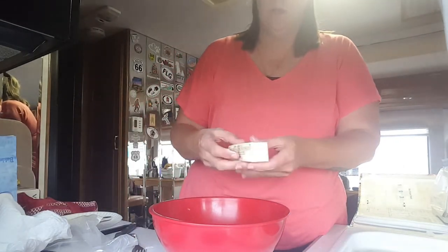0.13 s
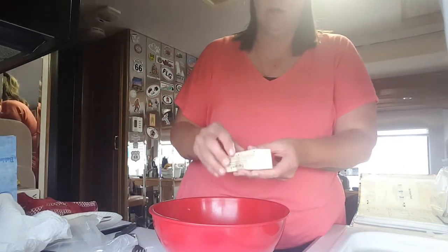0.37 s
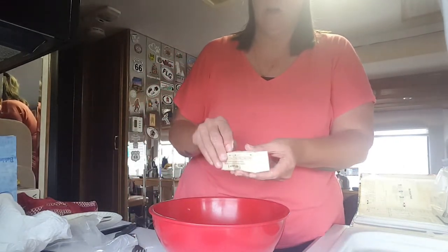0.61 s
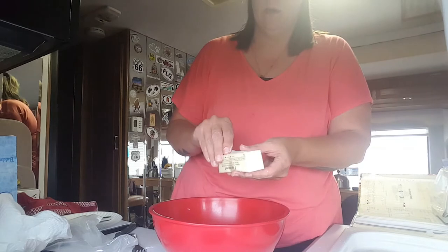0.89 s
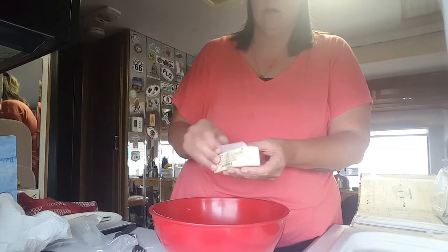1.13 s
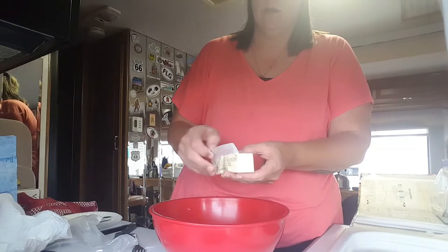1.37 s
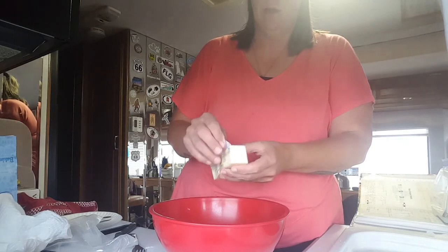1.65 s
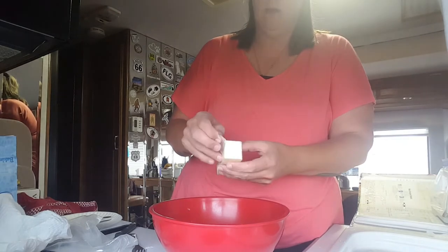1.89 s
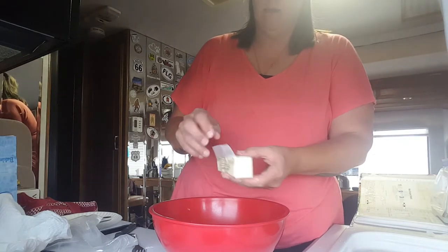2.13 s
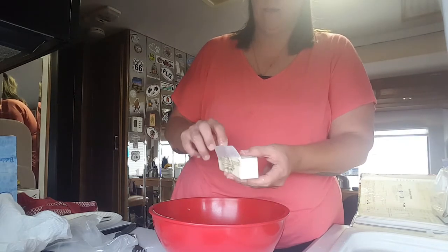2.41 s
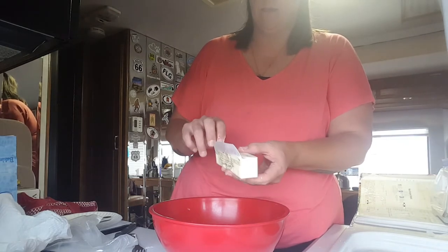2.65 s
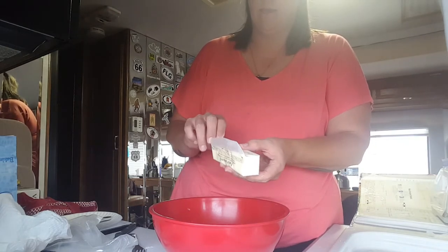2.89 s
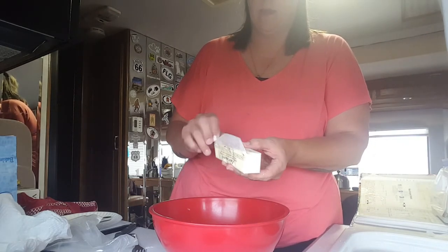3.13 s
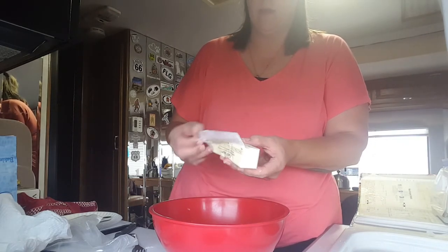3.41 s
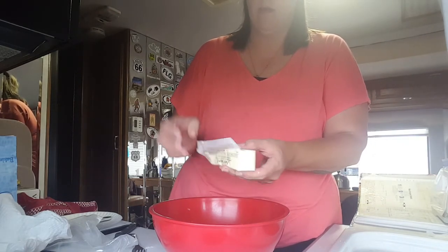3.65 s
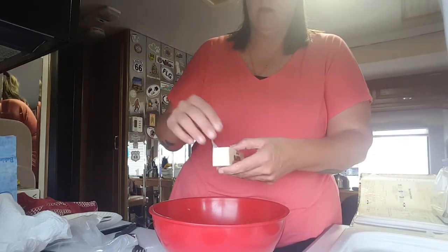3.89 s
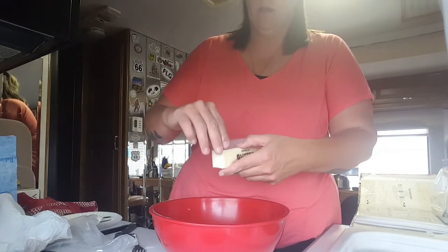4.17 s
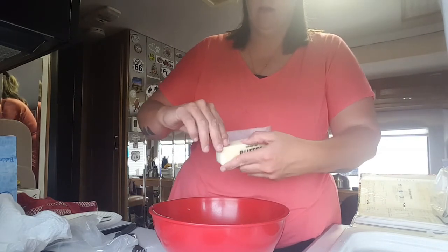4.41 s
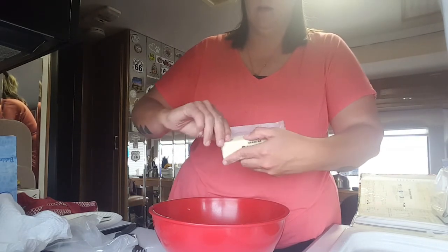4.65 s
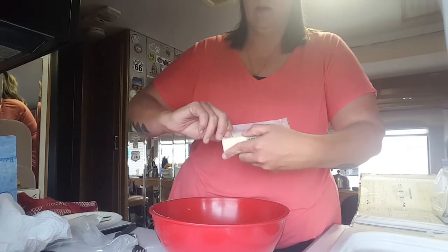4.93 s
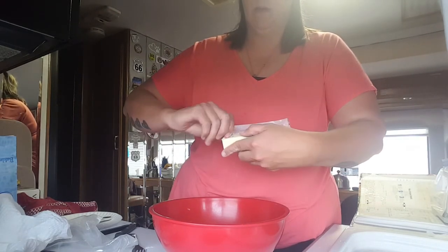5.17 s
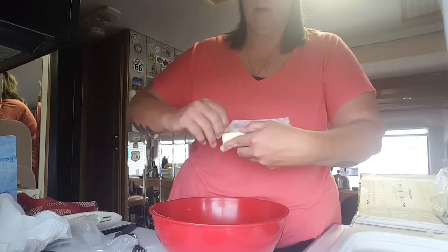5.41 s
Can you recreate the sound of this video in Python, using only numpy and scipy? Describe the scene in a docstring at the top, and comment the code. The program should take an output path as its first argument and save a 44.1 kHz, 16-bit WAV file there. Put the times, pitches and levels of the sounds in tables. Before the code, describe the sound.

Waxed paper is peeled off a butter stick: a whispering rustle, then a cluster of crisp cracks with the sharpest just before two seconds, more short crinkles up to about four, and a few lone clicks to the end. A constant deep engine drone and soft rumble lie beneath. Dry small room, close microphone, sound weighted left.

```python
"""Peeling waxed paper in a kitchen

Waxed paper is peeled off a butter stick in a small, soft-furnished kitchen: creases snap as cracks with
decaying grit, the sheet rustles as dense random ticks, and short sine rings sound on single pitches.
A generator engine throbs through the floor as harmonics of one firing cycle, over shaped noise.
A thin narrow hiss fades early on, and a soft low rub comes near the end.
Two microphone ports listen, the right one half shaded."""
import sys
import numpy as np
from scipy import signal
from scipy.fft import rfft, irfft, next_fast_len
from scipy.io import wavfile

SR = 44100
rng = np.random.default_rng(int(sys.argv[2]) if len(sys.argv) > 2 else 0)


def dump_mix(stems):
    """Bounce the given channels to the path in sys.argv[1] as a 16-bit WAV at rate SR."""
    frames = np.atleast_2d(stems).T  # one column per channel
    limited = np.clip(frames, -1, 1)  # hard clip at full scale
    pcm = np.round(limited * 32767).astype(np.int16)
    wavfile.write(sys.argv[1], SR, pcm)


def elevation(decibels):
    """Turn decibel levels (scalar or array-like) into linear amplitude ratios."""
    levels = np.asarray(decibels, float)
    return 10 ** (levels / 20)


N = 244755

# frequency bands of the paper sounds, about half an octave each: low_hz, high_hz
PAPER_BANDS = [(1000 * 1.4 ** k, 1400 * 1.4 ** k) for k in range(8)]


def at_hz(points, hz):
    """Spectral interpolation: reads a curve of points on a log-frequency axis."""
    curve_hz, value = np.transpose(points)
    return np.interp(np.log(hz), np.log(curve_hz), value)


def in_time(points):
    """Linear interpolation in time: a curve of (s, value) becomes one value per sample."""
    s, value = np.transpose(points)
    return np.interp(np.arange(N) / SR, s, value)


def drift(rate_hz):
    """Low-passed noise: two equal poles turn white noise into slow chance with spread 1."""
    knots_per_s = 100
    knots = rng.standard_normal(int(N / SR * knots_per_s) + 300)
    pole = np.exp(-2 * np.pi * rate_hz / knots_per_s)
    slow = signal.lfilter([1], [1, -2 * pole, pole * pole], knots)[298:]   # skip the settling
    return np.interp(np.arange(N) / SR * knots_per_s, np.arange(len(slow)), slow / np.std(slow))


def band(x, low_hz, high_hz, order=4):
    """Band-pass filtering, with gain for the lost bandwidth that keeps white noise near its rms."""
    sos = signal.butter(order, [low_hz, min(high_hz, SR / 2.2)], "band", fs=SR, output="sos")
    return signal.sosfilt(sos, x + 1e-18) * np.sqrt(SR / 2 / (high_hz - low_hz))


def resonate(x, peaks):
    """Resonance: a chain of second-order peaking filters, each raising or lowering one region."""
    for hz, width_hz, lift_db in peaks:
        a = 10 ** (lift_db / 40)
        w = 2 * np.pi * hz / SR
        k = np.sin(w) * width_hz / hz / 2
        zeros = [1 + k * a, -2 * np.cos(w), 1 - k * a]
        poles = [1 + k / a, -2 * np.cos(w), 1 - k / a]
        x = signal.lfilter(zeros, poles, x)
    return x


def coloured(x, gain_db):
    """Linear filtering in the frequency domain: applies a spectrum given as a function of Hz."""
    size = next_fast_len(N)
    hz = np.maximum(np.arange(size // 2 + 1) * SR / size, 1)
    return irfft(rfft(x, size) * elevation(gain_db(hz)), size)[..., :N]


def shares(level_db, pitch_hz, narrow_db, bands):
    """Spectral envelope: gain per band, falling in dB with the square of the octaves off the pitch."""
    centre_hz = np.sqrt(np.prod(bands, axis=1))
    return elevation(level_db - narrow_db * np.log2(centre_hz / pitch_hz) ** 2)


def rumble():
    """Partial coherence: rumble and air noise whose likeness at the two ports depends on frequency."""
    # left-port noise spectrum before the resonances: frequency_hz, level_db_per_hz
    spectrum = [(20, -82), (40, -78), (55, -69), (70, -73), (85, -70), (98, -62), (112, -66), (145, -67),
                (190, -66), (220, -72), (280, -76), (360, -79), (450, -78), (600, -82), (750, -86),
                (900, -85), (1020, -90), (1200, -90), (2300, -95), (3600, -99), (4600, -107), (7200, -113),
                (10000, -119), (16000, -124)]
    # resonances: frequency_hz, width_hz, lift_db
    rings = [(183, 16, 3), (257, 14, 6), (316, 16, 7), (345, 12, 3), (405, 24, 6), (625, 40, 4),
             (829, 24, 8), (920, 60, 3), (1230, 60, 4), (2070, 50, 4), (2690, 40, 3), (3280, 100, 3)]
    # shading of the right port: frequency_hz, left_minus_right_db
    shade = [(20, 0), (300, 13), (500, 10), (3000, 11), (5000, 7), (10000, 16)]
    # left-right correlation: frequency_hz, likeness (0 to 1)
    likeness = [(25, 0.26), (50, 1), (200, 0.92), (400, 0.89), (600, 0.073), (2000, 0.0077)]

    def alike(hz):
        return np.clip(at_hz(likeness, hz), .01, .99)

    left, other = rng.standard_normal((2, N)) * np.sqrt(SR / 2)   # 0 dB per Hz
    common = coloured(left, lambda hz: 20 * np.log10(alike(hz)))
    separate = coloured(other, lambda hz: 10 * np.log10(1 - alike(hz) ** 2))
    right = coloured(common + separate, lambda hz: -at_hz(shade, hz))
    both = resonate(np.array([left, right]), rings)
    both = coloured(both, lambda hz: at_hz(spectrum, hz))
    return both * elevation(.4 * drift(3.))


def engine(right_db=-13.5):
    """Fourier synthesis: orders of the firing cycle, phased as one causal thump whose spectrum they sample."""
    # engine orders: multiple_of_cycle, level_db (rms at the left port)
    orders = [(1, -63.2), (2, -55.7), (3, -55.8), (4, -51.9), (5, -48.1), (6, -34.3), (7, -39.1),
              (8, -44.9), (9, -48.8), (10, -44.8), (11, -51.2), (12, -62.9), (13, -64.3), (14, -54.4),
              (15, -59.3), (16, -64.9), (17, -66.6), (18, -83.2), (19, -78.9), (20, -76.4), (21, -65.7),
              (22, -71.5), (23, -69.4), (24, -74.1), (25, -69.4), (26, -63.5), (27, -73.5), (28, -64.6),
              (29, -74.2), (30, -72.9)]
    # high whine, before a slow flicker: multiple_of_cycle, level_db (rms at the left port)
    whine = [(32, -69), (36, -67), (40, -67), (55, -70), (59, -71)]
    # the governor hunts, so the cycle runs early: time_s, early_ms
    hunting = [(0.1, 1.08), (0.75, 2.66), (1.05, 2.25), (1.45, 0), (1.73, -.58), (2.3, 1.02), (2.52, .6),
               (2.95, -.85), (3.27, -.8), (3.72, .92), (4.5, 1.65), (4.97, 1.8), (5.55, -.5)]
    cycle_hz = 15.13
    order, level_db = np.transpose(orders)
    cycle = 2 * np.pi * cycle_hz * (np.arange(N) / SR + in_time(hunting) / 1000)
    # minimum phase from the folded cepstrum
    log_gain = np.interp(np.arange(129), order, np.log(elevation(level_db)))
    folded = irfft(log_gain) * np.r_[1, np.full(127, 2), 1, np.zeros(127)]
    phase = rfft(folded).imag[np.round(order).astype(int)]
    # the thump smears on its way through the floor, higher orders arriving later
    early_ms, later_ms_per_order, odd_lag_rad = 18.6, 10.9, .9
    rad_per_ms = 2 * np.pi * cycle_hz / 1000
    phase += rad_per_ms * (early_ms * order - later_ms_per_order / 2 * (order - 6) ** 2)
    phase -= odd_lag_rad * (order % 2)
    out = sum(elevation(db) * np.cos(round(k) * cycle + p) for k, db, p in zip(order, level_db, phase))
    out += sum(elevation(db + 0.83 * drift(2.0)) * np.cos(round(k) * (cycle + k)) for k, db in whine)
    uneven = elevation(.7 * drift(12.))   # firings differ a little in strength
    return np.sqrt(2) * out * uneven * elevation([[0], [right_db]])


def thin_hiss(right_db=-12.0):
    """Band-limited noise, incoherent at the two ports: it rises, holds and then falls away."""
    low_hz, high_hz = 3100, 3750
    held_db, full_s, end_s, rise_db_per_s, fall_db_per_s = -69.5, .55, 1.17, 15, 68
    t = np.arange(N) / SR
    level_db = held_db - rise_db_per_s * np.maximum(full_s - t, 0) - fall_db_per_s * np.maximum(t - end_s, 0)
    noise = band(rng.standard_normal((2, N)), low_hz, high_hz)
    return elevation(level_db) * noise * elevation([[0], [right_db]])


def rub(right_db=-11):
    """Friction noise, soft and low, as of a palm on the stick: a band swells and sinks parabolically."""
    middle_s, half_length_s, level_db, low_hz, high_hz = 5.39, .09, -55, 520, 800
    swell = np.clip(1 - ((np.arange(N) / SR - middle_s) / half_length_s) ** 2, 0, 1)
    noise = band(rng.standard_normal(N), low_hz, high_hz)
    return elevation(level_db) * swell * noise * elevation([[0], [right_db]])


def kitchen(x):
    """Reverberation: direct sound, three samples late at the right port, plus exponentially decaying noise."""
    t = np.arange(SR // 3) / SR
    out = np.array([x, np.r_[np.zeros(3), x[:-3]]])
    # close reflections, then a faint longer tail: t60_s, level_db, gap_s
    for t60_s, level_db, gap_s in ((0.068, -7, .0012), (0.18, -19.5, .008)):
        decay = elevation(-60 * t / t60_s) * (t > gap_s)
        tail = rng.standard_normal((2, len(t))) * decay / np.sqrt(np.sum(decay ** 2))
        out += elevation(level_db) * signal.fftconvolve(x[None], tail, axes=1)[:, :N]
    return out


def rustle(per_s=2800.0, spread_db=1.5, clump_db=3.0, trim_db=-12.0, edge_ms=8.3):
    """Shot noise: dense tiny ticks of fibre on fibre; each drag swells in and out over the whisper."""
    # the sheet whispering in the hand between drags, before the trim: time_s, level_db
    whisper = [(0, -61), (.2, -79), (.6, -68.5), (1.1, -69), (1.35, -90), (1.9, -73), (2.2, -96),
               (2.8, -70), (3.6, -102), (4.0, -77), (4.4, -85), (5.55, -82)]
    # fingers dragging over the sheet, before the trim: start_s, length_ms, level_db, pitch_hz
    swishes = [(0.25, 157, -65.5, 6500), (0.5, 72.0, -64, 6530), (0.63, 100.0, -70.4, 4670),
               (0.83, 72, -63.5, 5770), (0.9, 38.0, -73, 6560), (1.04, 83, -62.5, 5930),
               (1.13, 24.5, -52.5, 5500), (1.185, 110, -60.5, 4770), (1.415, 26, -56, 3720),
               (1.445, 52, -56, 4720), (1.68, 20, -51.5, 4500), (2.06, 36, -62, 5040),
               (2.572, 27.0, -49, 5100), (2.64, 50, -55.5, 4470), (2.7, 75.0, -61.0, 4730),
               (2.83, 71, -63.5, 5640), (2.875, 60, -54, 4730), (2.95, 45.0, -65.0, 4440),
               (3.12, 80, -69.1, 5160), (3.215, 43, -65.8, 3580), (3.35, 27.0, -74, 5910),
               (3.49, 36, -62.0, 2940), (3.649, 23.0, -45, 6100), (3.675, 58.0, -63, 5880),
               (4.095, 26.0, -73.9, 5910), (4.16, 100.0, -61.2, 5840), (4.24, 35.0, -61.1, 3910),
               (4.285, 26.0, -64.5, 4900), (4.69, 40.0, -72, 5850), (5.02, 30.0, -67.8, 6510),
               (5.46, 49, -65, 4620)]
    bands = PAPER_BANDS[1:]
    whisper_hz, narrow_db = 4600, 6.5   # narrow_db is lost one octave off the pitch
    patchy_db = 2.5   # each band flickers on its own
    power = np.outer(shares(0, whisper_hz, narrow_db, bands), elevation(in_time(whisper))) ** 2
    ms = np.arange(N) / SR * 1000
    for start_s, length_ms, level_db, pitch_hz in swishes:
        near = slice(round(start_s * SR), round(start_s * SR + length_ms * SR / 1000))
        since = ms[near] - ms[near][0]
        swell = np.clip(np.minimum(since, length_ms - since) / edge_ms, 0, 1)
        power[:, near] += np.outer(shares(level_db, pitch_hz, narrow_db, bands), swell) ** 2
    sizes = elevation(spread_db * np.minimum(rng.exponential(1, N), 4)) * rng.choice([-1, 1], N)
    ticks = sizes * (rng.random(N) < per_s / SR) * elevation(clump_db * drift(40.0))
    ticks *= elevation(trim_db) / np.std(ticks)
    out = np.zeros(N)
    for band_power, (low_hz, high_hz) in zip(power, bands):
        flicker = elevation(patchy_db * drift(30.0))
        out += np.sqrt(band_power) * flicker * band(ticks, low_hz, high_hz)
    return out


def short_rings():
    """Damped oscillation: each ring is a sine on one pitch with exponential decay."""
    # the sheet ringing under its loudest snap, and small pitched rubs:
    # start_s, level_db (initial), pitch_hz, t60_s
    rings = [(1.8928, -32.5, 1320, .022), (1.8928, -28.5, 3450, .016), (2.549, -46, 2010, .025),
             (2.655, -54, 1700, .02), (2.69, -53, 2050, .03), (2.712, -49, 1950, .03),
             (3.536, -60, 7500, .02)]
    out, t = np.zeros(N), np.arange(2000) / SR
    for start_s, level_db, pitch_hz, t60_s in rings:
        i = round(start_s * SR)
        out[i:i + 2000] += elevation(level_db - 60 * t / t60_s) * np.sin(2 * np.pi * pitch_hz * t)
    return out


def snaps(grit_share=0.55, crack_share=0.7):
    """Impulsive release: a crease gives way with one sharp crack, then grit that dies within milliseconds."""
    # creases, before the band trims: start_s, level_db, pitch_hz, narrow_db (lost one octave off the pitch)
    creases = [(0.905, -57, 1700, 2), (0.928, -61.5, 5810, 9), (1.0376, -52, 4790, 2),
               (1.1622, -37, 9500, 2), (1.231, -43.5, 2200, 3.5), (1.2548, -52.5, 3060, 3),
               (1.2717, -55, 2820, 3), (1.3544, -40.5, 1950, 5.5), (1.482, -52.5, 1270, 1.0),
               (1.531, -60, 8000, 0.5), (1.686, -52, 4600, 4), (1.83, -50.5, 1580, 5),
               (1.8932, -33.5, 4000, 2.5), (2.082, -55.5, 2000, 1), (2.577, -52, 3640, 5),
               (2.586, -51, 3120, 8), (2.754, -53.9, 6140, 23), (2.812, -63, 5790, 17.3),
               (3.168, -57.6, 1140, 1.9), (3.181, -57, 1020, 6), (3.205, -54.6, 2860, 6.5),
               (3.2142, -50, 3170, 2.5), (3.325, -61.3, 1840, 3), (3.3577, -55.5, 6300, 22),
               (3.398, -54, 1900, 11), (3.42, -40.5, 1850, 17), (3.495, -51, 5100, 25),
               (3.5009, -45, 2430, 26), (3.62, -68.9, 12420, 4), (3.664, -52, 1500, -2),
               (3.712, -61.9, 4310, 11), (4.1005, -63.0, 5820, 19), (4.2372, -42, 4630, 7),
               (4.701, -58.7, 5950, 10), (5.0235, -38.5, 6200, 31), (5.48, -42, 4500, 2.5)]
    # level trim of each band, low to high: trim_db
    trims = [2.3, 2.1, 1.7, 0.92, 0.92, 1.5, 1.6, 1]
    grit_ms = 1.4   # time constant of the grit
    out = np.zeros((len(PAPER_BANDS), N + 2000))
    fade = np.exp(-np.arange(2000) / SR * 1000 / grit_ms)
    bursts = grit_share * rng.standard_normal((len(creases), 2000)) * fade
    bursts[:, 0] -= crack_share * np.sqrt(np.sum(fade ** 2))   # the crack carries a share of the energy
    for (start_s, level_db, pitch_hz, narrow_db), burst in zip(creases, bursts):
        i = round(start_s * SR)
        gains = shares(level_db, pitch_hz, max(narrow_db, 0), PAPER_BANDS)
        out[:, i:i + 2000] += np.outer(gains, burst)
    signs = (-1) ** np.arange(len(out))   # gentle neighbouring filters join in phase
    return sum(sign * elevation(trim_db) * band(x[:N], low_hz, high_hz, order=2)
               for x, (low_hz, high_hz), trim_db, sign in zip(out, PAPER_BANDS, trims, signs))


def scene():
    """Superposition: paper in the room over engine, rumble, thin hiss and rub."""
    # what the sheet and the bowl under it ring with: frequency_hz, width_hz, lift_db
    paper_rings = [(1310, 220, 9), (1750, 250, -3), (2550, 500, -3), (3410, 400, 7), (4200, 400, 4),
                   (5600, 400, -2), (6250, 450, 7), (10200, 1800, 3)]
    # shading of the right port: frequency_hz, left_minus_right_db
    paper_shade = [(900, 0), (1400, 8.5), (2400, 4.5), (3400, 10.5), (4400, 2), (5500, 6.5), (7500, 41),
                   (10000, 12), (14000, 11)]
    sheet = resonate(snaps() + rustle(), paper_rings) + short_rings()
    left, right = kitchen(sheet)
    right = coloured(right, lambda hz: -at_hz(paper_shade, hz))
    return np.array([left, right]) + engine() + rumble() + thin_hiss() + rub()


def top_cut(x):
    """Nothing passes above the cut-off."""
    return signal.sosfilt(signal.butter(12, 16480, fs=SR, output="sos"), x)


def record(dry):
    """Transducer self-noise: each port adds its own hiss and a small constant offset."""
    # self-noise spectrum: frequency_hz, level_db_per_hz
    self_noise = [(20, -130), (3000, -124), (9000, -123), (14500, -118), (17000, -118)]
    white = rng.standard_normal((2, N)) * np.sqrt(SR / 2)
    hiss = coloured(white, lambda hz: at_hz(self_noise, hz))
    return top_cut(dry + hiss - .0006)


dry = scene()
out = record(dry)
dump_mix(out)
```